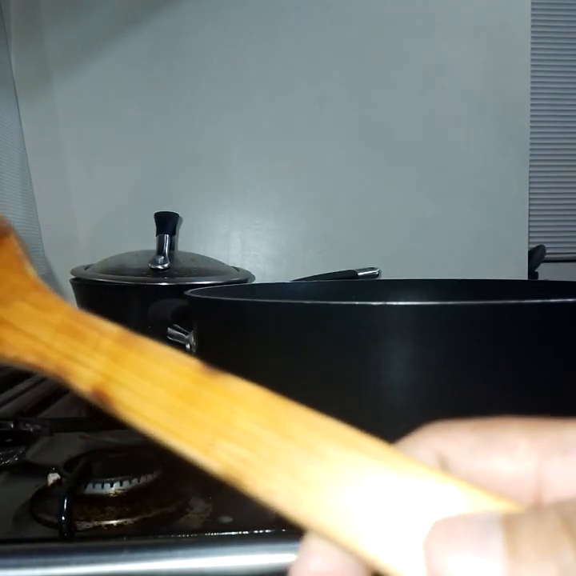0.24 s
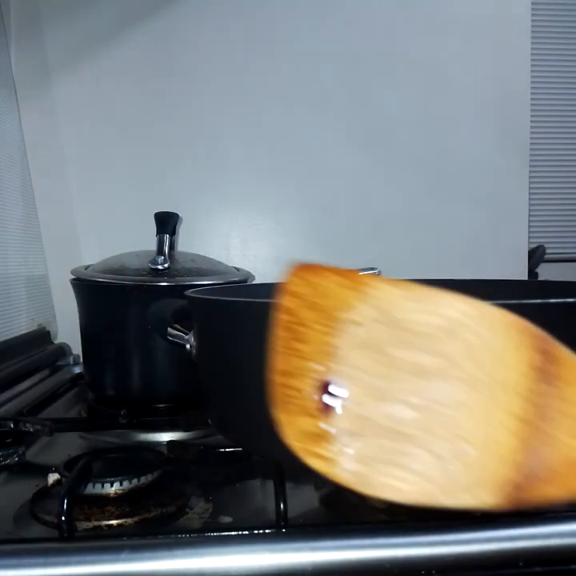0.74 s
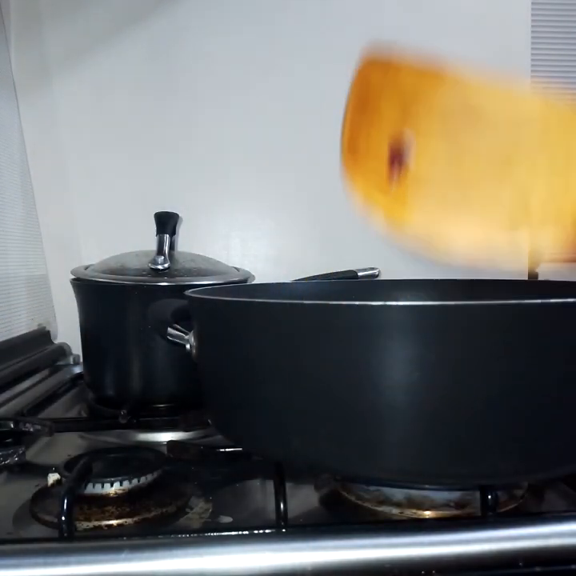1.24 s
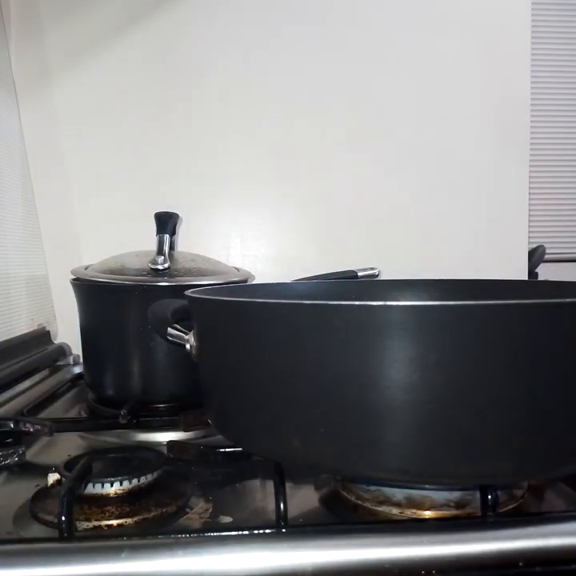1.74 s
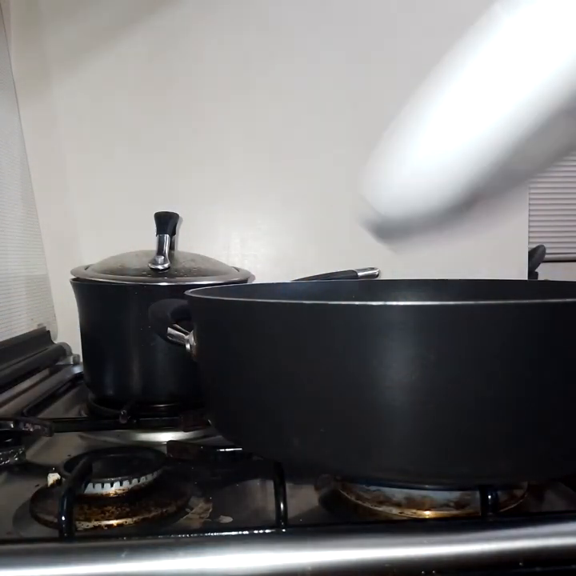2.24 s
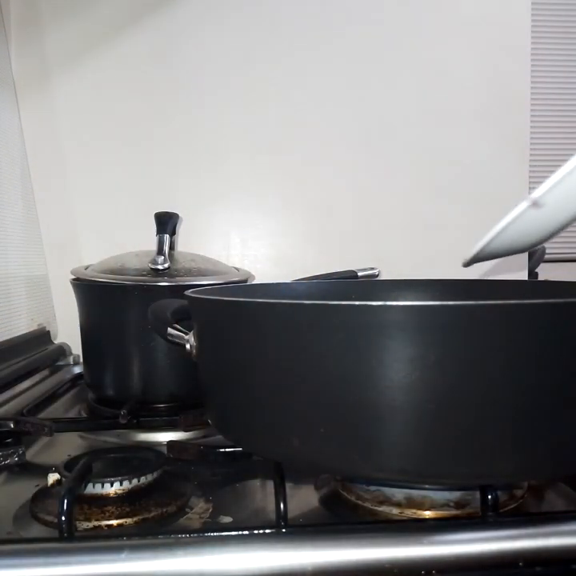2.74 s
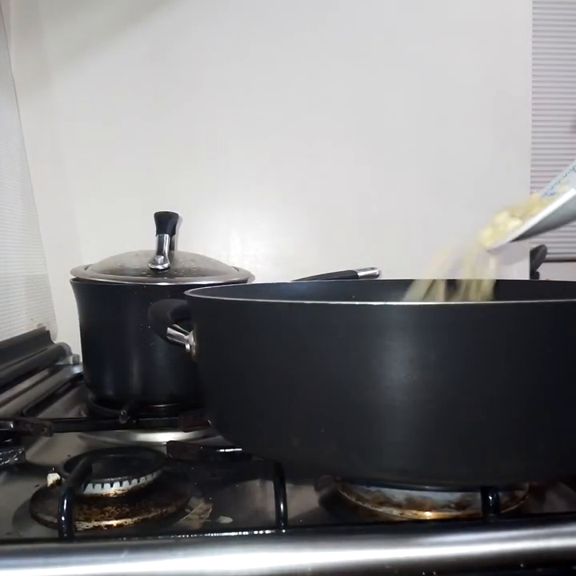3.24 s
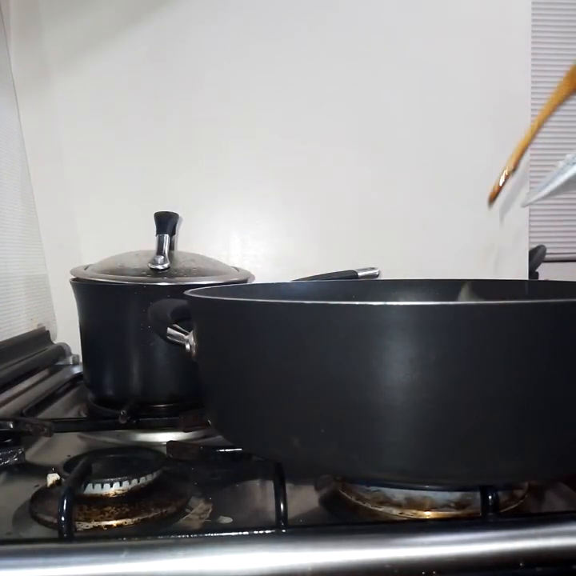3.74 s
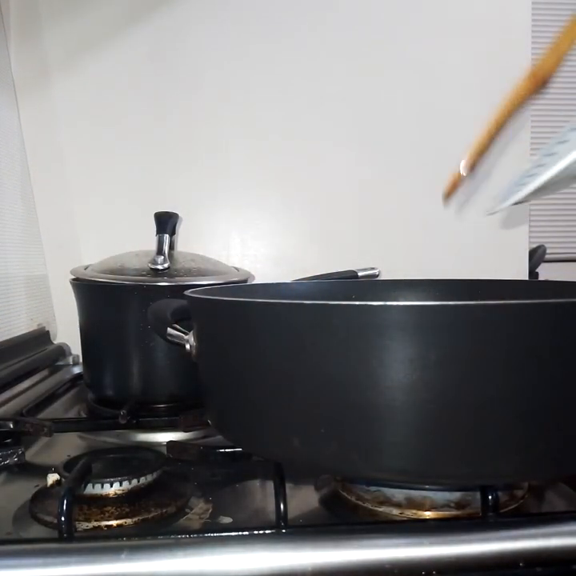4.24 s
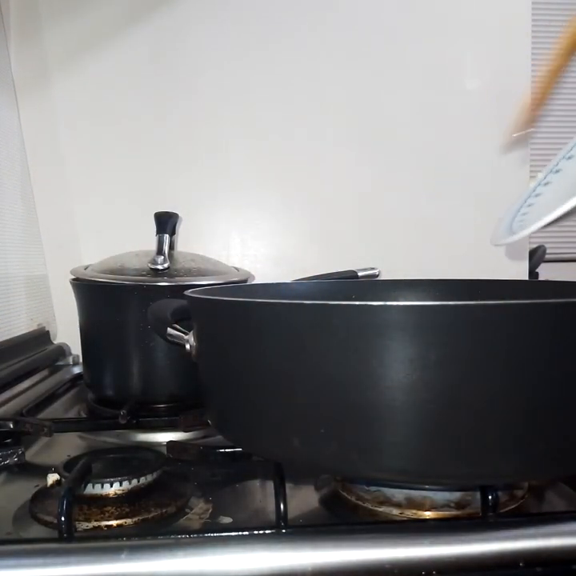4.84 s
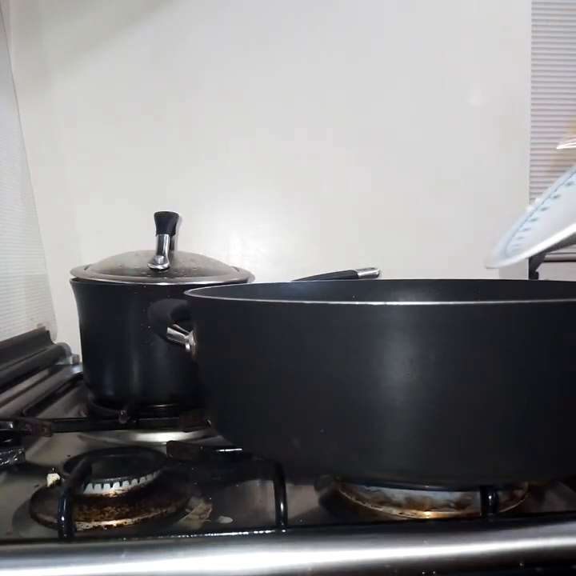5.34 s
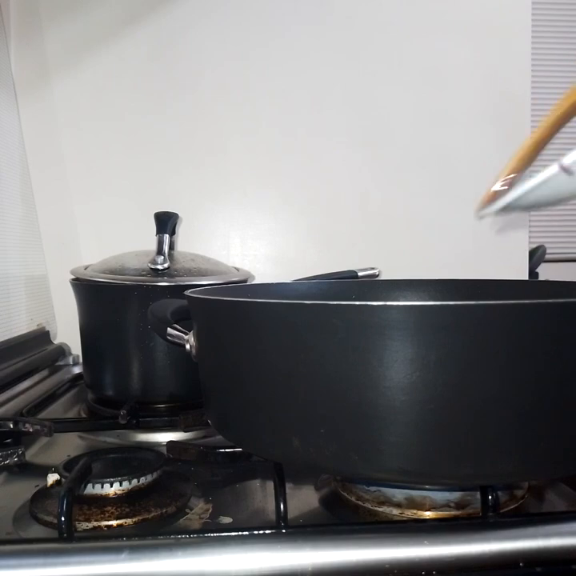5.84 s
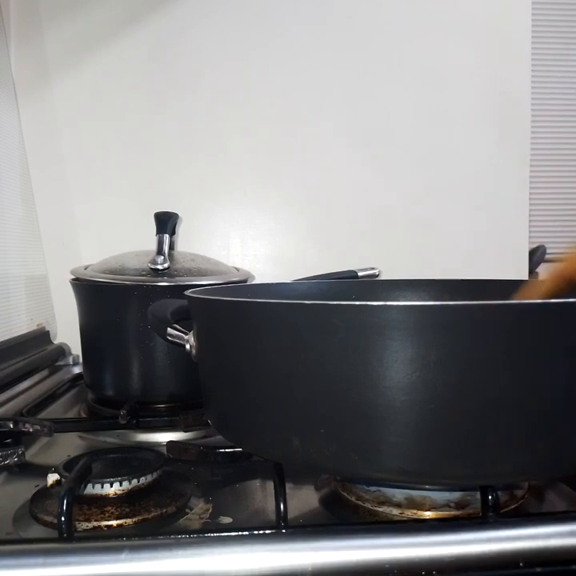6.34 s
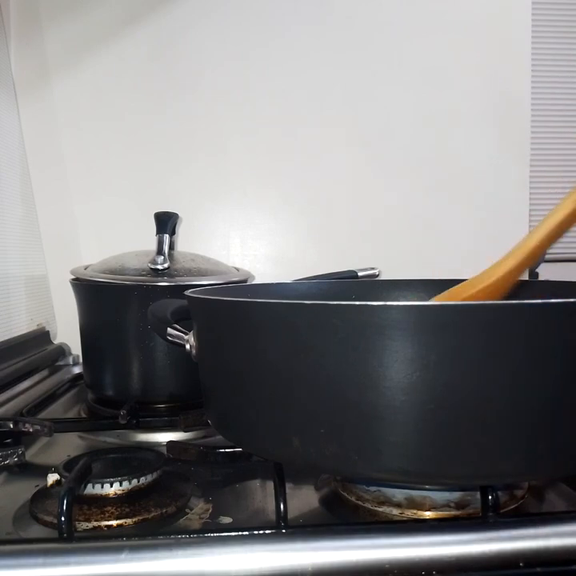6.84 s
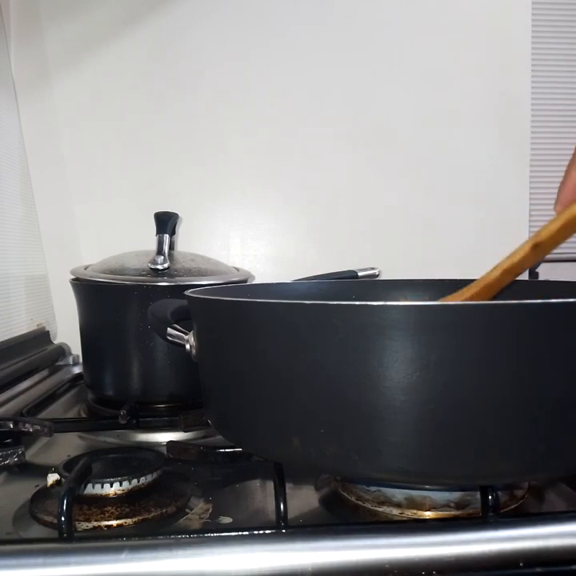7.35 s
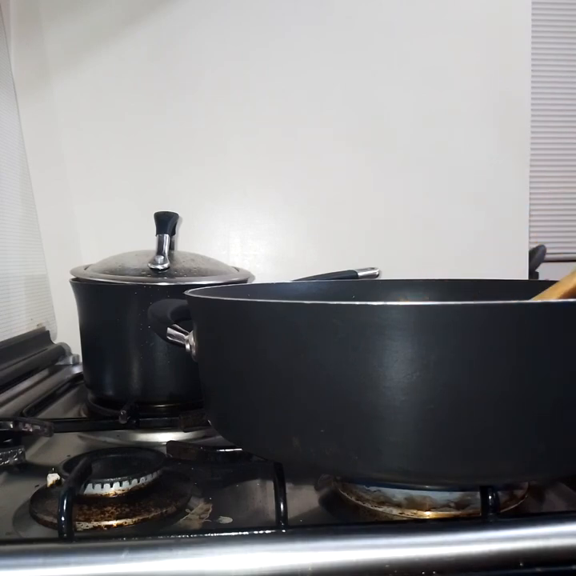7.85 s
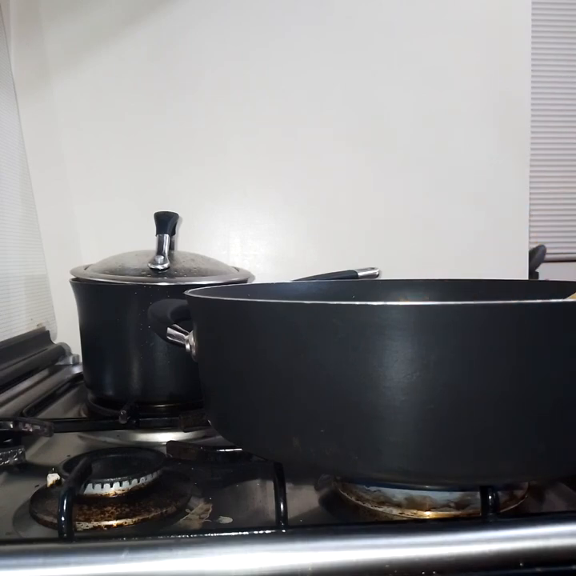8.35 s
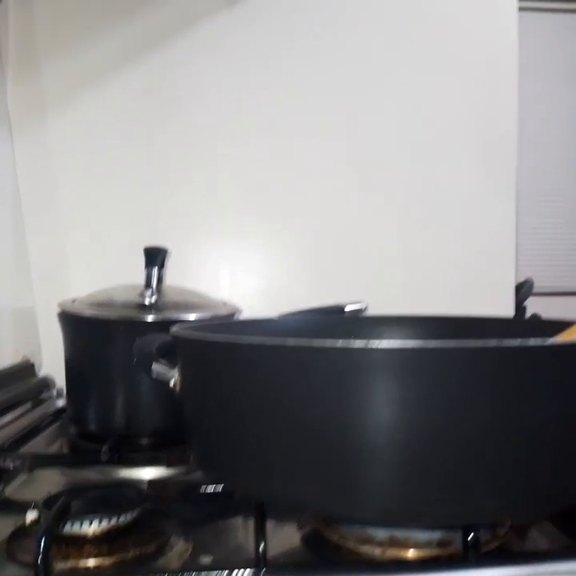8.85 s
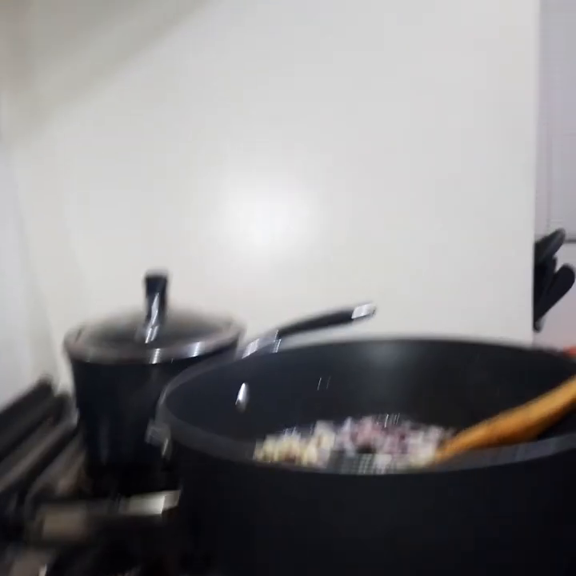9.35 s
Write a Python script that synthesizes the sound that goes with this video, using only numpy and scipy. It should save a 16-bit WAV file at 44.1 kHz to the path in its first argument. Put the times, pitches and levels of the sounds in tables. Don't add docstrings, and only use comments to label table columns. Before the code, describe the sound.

Steady frying fizz with small spits, wood clinking and squeaking on china, a hard dull pan knock, and finally sharp finger clicks very close.

```python
import sys
import numpy as np
from scipy import signal
from scipy.fft import rfft, irfft, next_fast_len
from scipy.io import wavfile
from scipy.ndimage import uniform_filter1d, map_coordinates

SR = 44100
rng = np.random.default_rng(int(sys.argv[2]) if len(sys.argv) > 2 else 0)


def level_to_linear(level):
    exponent = np.asarray(level, float) / 20
    return 10 ** exponent


def materialize(psi):
    bounded = np.clip(np.atleast_2d(psi).T, -1, 1)
    quanta = np.round(bounded * 32767).astype(np.int16)
    wavfile.write(sys.argv[1], SR, quanta)


N = 422919

# (time [s], length [s], rumble [dB], rustle at the left port [dB])
GRIPS = [
    (8.55, 0.14, -67, -71),
    (9.1, 0.1, -54, -53),
]
GRIP_S = 0.05, 0.39
LAG = 22 / SR


def unit(x):
    return x / np.sqrt(np.mean(x ** 2) + 1e-20)


def along(points, hz):
    f, v = np.transpose(points)
    return np.interp(np.log(hz + 1), np.log(f + 1), v)


def curves(rows):
    s, *cols = np.transpose(rows)
    return [np.interp(np.arange(N) / SR, s, c) for c in cols]


def strokes(rows, attack, release, order):
    t = np.arange(0, N, 32) / SR
    db = []
    for row in rows:
        swell = 20 * np.minimum(t - row[0], 0) / attack
        fade = 60 * np.maximum(t - row[0] - row[1], 0) / release
        db.append(row[order] + swell - fade)
    return np.interp(np.arange(N) / SR, t, level_to_linear(np.max(db, axis=0)))


def wobble(rate):
    knots = rng.standard_normal(int(N * rate / SR) + 4)
    return map_coordinates(knots, [np.arange(N) * rate / SR])


def filtered(x, response):
    m = next_fast_len(N + SR // 2)
    return irfft(rfft(x, m) * response(np.fft.rfftfreq(m, 1 / SR)), m)[..., :N]


def resonances(peaks):
    def response(f):
        return sum((-1) ** k * level_to_linear(db) * 1j * f * w / (c * c - f * f + 1j * f * w)
                   for k, (c, w, db) in enumerate(peaks))
    return response


def rush(spectrum, alike, patchy_db, lag=0.):
    z = signal.stft(rng.standard_normal((2, N)), nperseg=512)[2]
    patches = uniform_filter1d(rng.standard_normal(z.shape[1:]), 6, 0)
    patches = uniform_filter1d(patches, 14, 1)
    a, b = signal.istft(z * level_to_linear(patchy_db * unit(patches)), nperseg=512)[1][:, :N]
    alike = np.clip(alike, 0, 1)
    pair = np.array([np.roll(a, round(lag * SR)), alike * a + np.sqrt(1 - alike ** 2) * b])
    return unit(filtered(pair, lambda hz: level_to_linear(along(spectrum, hz))))


def ring(modes, t, scatter_db):
    return sum(level_to_linear(db + scatter_db * rng.normal() - 60 * t / t60) * np.sin(2 * np.pi * hz * t)
               for hz, db, t60 in modes)


def shaken(modes, t, contact, chatter_db):
    force = (level_to_linear(-60 * t / contact) + level_to_linear(chatter_db - 60 * t / 0.58)) * rng.standard_normal(len(t))
    body = signal.fftconvolve(ring(modes, t, scatter_db=3.5), force)[:len(t)]
    return level_to_linear(19.0) * body / np.linalg.norm(body)


def oil():
    # (time [s], level [dB])
    fizz_levels = [(0.0, -57), (1.2, -56.5), (1.42, -57), (1.84, -53), (2.11, -55), (2.32, -56),
                   (3.0, -57.5), (3.12, -55), (3.44, -56), (4.41, -56.5), (4.54, -53.5), (4.78, -56),
                   (5.8, -57.5), (6.01, -55.5), (6.2, -56.5), (8.97, -57), (9.16, -56), (9.59, -55)]
    # (frequency [Hz], level [dB])
    fizz_spectrum = [(2000, -17), (3000, 2), (4000, 1), (6000, 0), (9000, 3.5), (12000, 0), (16000, -3.5)]
    fizz_db, = curves(fizz_levels)
    grains = np.zeros((2, N))
    at = rng.integers(0, N, (2, 9000))
    size = level_to_linear(np.minimum(3.5 * rng.exponential(size=at.shape), 16))
    np.put_along_axis(grains, at, size * rng.choice([-1, 1], at.shape), axis=1)
    crackle = unit(filtered(grains, lambda hz: level_to_linear(along(fizz_spectrum, hz))))
    fizz = rush(fizz_spectrum, alike=0.017, patchy_db=2.0) + level_to_linear(-9.5) * crackle
    sides_db = (0.2 + 0.72 * wobble(4.5)) * np.array([[0.5], [-0.5]])
    level = level_to_linear(fizz_db + sides_db - 4.5 + 0.18 * wobble(4.9) + 0.53 * wobble(30))
    rustle = strokes(GRIPS, *GRIP_S, order=3) * np.array([[1], [0]])
    return np.hypot(level, rustle) * fizz


def spits():
    # (time [s], peak [dB], centre [Hz], left minus right [dB])
    pops = [(0.2887, -40, 6870, -3), (1.3897, -38.5, 7600, 11), (1.4381, -42, 10100, 2),
            (1.487, -42, 6870, 2), (2.1126, -33, 7660, 12), (3.1053, -37, 7220, 3),
            (3.1994, -42, 9730, -1.5), (5.019, -43, 7180, -3), (5.1931, -39, 10400, -3),
            (5.3594, -42, 10500, -4), (6.078, -37, 13000, 0), (6.1764, -47, 10600, 0),
            (7.2095, -40, 9990, -8), (8.6482, -38, 6510, 4), (8.8169, -44, 9840, -4)]
    # (time [s], peak [dB], centre [Hz], left minus right [dB])
    sputters = [(0.203, -36.5, 6880, 9), (0.8894, -43.5, 6700, 6), (1.1563, -42, 9760, -4),
                (1.2845, -42, 9980, -3), (1.5894, -43, 7170, 0.5), (1.749, -35, 9600, -9),
                (1.904, -37.5, 7500, 10.5), (4.0044, -40, 7170, 2.5), (4.36, -43, 7200, -3),
                (4.575, -40, 10300, -5), (6.08, -40, 9790, 3), (7.0194, -43, 7370, -6),
                (9.3995, -41.5, 7150, 1)]
    pop_kind, sputter_kind = (0.015, -4, 0.91), (0.039, -20, 0.59)
    bursts = [(*row, *pop_kind) for row in pops] + [(*row, *sputter_kind) for row in sputters]
    out, t = np.zeros((2, N + SR)), np.arange(SR // 20) / SR
    for s, db, hz, pan_db, t60, spray_db, follow in bursts:
        t60 = np.clip(t60, 0.003, 0.06)
        shape = level_to_linear(-60 * t / t60) * (1 - np.exp(-t / (0.053 * t60)))
        puff, mist = rng.standard_normal((2, 2, len(t))) * shape
        ratio = 1.1 + 0.0028 / t60
        band = [hz / ratio, min(hz * ratio, 20000)]
        pop = signal.lfilter(*signal.butter(2, band, "band", fs=SR), puff)
        spray = signal.lfilter(*signal.butter(2, 11000, "high", fs=SR), mist)
        sides = level_to_linear(np.array([[pan_db], [-pan_db]]) / 2)
        burst = level_to_linear(db - 1.5) * sides * pop + level_to_linear(follow * db + spray_db) * spray
        out[:, round(s * SR):][:, :len(t)] += burst
    return out[:, :N]


def plate():
    # (time [s], ring [dB], spot from well to rim [0-1], flexing [dB], hardness [dB])
    taps = [(1.2851, -52.5, 0.9, 1, -6), (2.2195, -57.5, 0.4, 11, 14), (3.3022, -40, .9, -8, -28),
            (3.335, -63.5, .6, 11, -8), (3.8905, -35, 0.5, -19, -4), (3.922, -47, .8, -25, 0),
            (4.3945, -35, 0.93, -4, -7), (4.929, -46.5, 0.54, 0, -10), (5.3332, -46, 0.5, -6, -21),
            (5.355, -50, 0.84, -16, -23), (5.7225, -42.5, 0.27, -2, -22), (5.805, -46.5, 0.9, 3.5, -5),
            (5.8783, -41.5, 0.98, -4.5, -6.5), (6.8467, -46.5, 0.2, 13.5, -4.5)]
    # (frequency [Hz], level [dB], t60 [s])
    low_families = [
        [(1240, 49, 0.031), (1180, -8, 0.093), (1610, -31, 0.045), (1120, -29, 0.023)],
        [(1989, -10, 0.045), (1910, -16, 0.034), (1895, 11, .04)],
        [(2156, 5, 0.043), (2415, -7, .02), (2530, -8.5, 0.028), (2860, -33, 0.017)],
    ]
    # (frequency [Hz], level [dB], t60 [s])
    upper_modes = [(2885, -3, 0.032), (3680, -5, .01), (4100, -9, .01), (4820, 0.5, 0.027), (5650, 2, .012),
                   (6080, -1, 0.023), (6800, -3, .012), (7100, -8, 0.027), (7500, -11, .015),
                   (8815, -12, .012), (9600, -21, .012)]
    chatter = -12.5, -10.5, -22
    out, t = np.zeros((2, N + SR)), np.arange(SR // 4) / SR
    thin = signal.butter(3, 750, "high", fs=SR)
    for s, db, spot, flex_db, hard_db in taps:
        spot = np.clip(spot, 0, 1)
        gains = level_to_linear(flex_db), np.sqrt(1 - spot), np.sqrt(spot)
        low = sum(level_to_linear(db) * gain * shaken(family, t, contact=0.039, chatter_db=rattle_db)
                  for gain, family, rattle_db in zip(gains, low_families, chatter))
        clatter = (level_to_linear(-60 * t / 0.1) + level_to_linear(-6.5 - 60 * t / 0.13)) * rng.standard_normal(len(t))
        crack = signal.lfilter(*signal.butter(2, [1800, 7500], "band", fs=SR), clatter)
        glaze = shaken(upper_modes, t, contact=0.0087, chatter_db=-27)
        high = level_to_linear(db + hard_db) * (glaze + level_to_linear(-4.5) * crack)
        parts = signal.lfilter(*thin, level_to_linear([[11], [5]]) * [low, high])
        add(out, s, parts, right_db=[-11, -8], wet_db=[[-4.0, -4.0], [-13.5, -7]])
    return out[:, :N]


def scrapes():
    # (time [s], length [s], edge whistle [dB], rim [dB])
    slides = [
        (3.91, .06, -68, -57),
        (4.008, .008, -47, -53),
        (4.395, 0.14, -47, -75),
        (4.55, 0.089, -44.5, -79),
        (4.66, .1, -52, -71),
        (4.78, .3, -58, -75),
        (5.81, 0.022, -56, -55),
        (5.865, 0.031, -66, -49.5),
        (6.078, 0.0097, -53, -57.5),
    ]
    # (frequency [Hz], width [Hz], level [dB])
    edge_modes = [(9730, 60, -9), (9990, 87, -10), (10400, 120, -4), (10900, 70, -9), (13300, 77, -14),
                  (13700, 33, 0), (15400, 240, -10)]
    # (frequency [Hz], width [Hz], level [dB])
    rim_modes = [(7190, 16, 14), (6750, 48, -22), (6870, 110, -1)]
    edge = strokes(slides, attack=0.022, release=0.25, order=2)
    rim = strokes(slides, attack=0.0081, release=0.87, order=3)
    slips = level_to_linear(1.3 * wobble(70)) * rng.standard_normal((2, N))
    whistle = edge * level_to_linear(-13.5) * unit(filtered(slips, resonances(edge_modes)))
    return whistle + rim * level_to_linear([[-7], [-12]]) * unit(filtered(slips, resonances(rim_modes)))


def pan():
    # (time [s], length [s], bottom [dB], wall [dB])
    drags = [
        (3.17, .02, -51.5, -70),
        (3.212, 0.046, -44, -66),
        (3.715, .01, -50.5, -63),
        (6.9, 0.0056, -50, -28),
        (6.905, 0.095, -34, -44.5),
        (7.0, .04, -44, -49),
        (7.06, 0.095, -54.5, -54.5),
    ]
    # (time [s], level [dB])
    bumps = [
        (3.212, -60),
        (6.9, -33),
    ]
    # (frequency [Hz], width [Hz], level [dB])
    bottom_modes = [(528, 22.5, 8.5), (585, 22, 11), (635, 52, 2), (874, 35, -6.5)]
    # (frequency [Hz], width [Hz], level [dB])
    wall_modes = [(1202, 32, 7.5), (1040, 73, 1), (1390, 73, -10), (1600, 82, -6), (1930, 77, -9),
                  (2620, 140, -20)]
    bottom = strokes(drags, attack=0.0095, release=0.16, order=2)
    wall = strokes(drags, attack=0.0055, release=0.068, order=3)
    rub, blows = level_to_linear(2.2 * wobble(60)) * rng.standard_normal(N), np.zeros(N)
    for s, db in bumps:
        blows[round(s * SR):][:18] = level_to_linear(db + 24) * np.hanning(18)
    drive = np.array([rub, blows])
    low_rub, low_blows = filtered(drive, resonances(bottom_modes))
    high_rub, high_blows = filtered(drive, resonances(wall_modes))
    friction = bottom * level_to_linear(-3.5) * unit(low_rub) + wall * level_to_linear(-6.0) * unit(high_rub)
    near = friction + low_blows + high_blows
    direct = np.array([np.roll(near, round(LAG * SR)) * level_to_linear(4.5), near * level_to_linear(-4.0)])
    return direct + level_to_linear([[-4], [-8]]) * kitchen(near[None])[:, :N]


def finger():
    # (time [s], click [dB], pitch [Hz], t60 [s], case [dB])
    snaps = [
        (9.0789, -37, 6470, .006, -50),
        (9.0832, -6, 4930, 0.0027, -28),
        (9.0852, -17, 5170, 0.0066, -41),
        (9.0916, 0, 1970, 0.0025, -14),
        (9.0934, -5.5, 3520, 0.0066, -26),
        (9.0952, -14.5, 4200, 0.0086, -31.5),
    ]
    # (frequency [Hz], level [dB], t60 [s])
    case_modes = [(93, -12, 0.048), (307, 2, 0.045), (357, 6, 0.034), (535, 1.5, 0.013), (813, 3, 0.021),
                  (891, -11, 0.15), (1606, -10, 0.057), (2190, 6, 0.011), (3055, -12, 0.074),
                  (6600, -16.5, 0.043), (11600, -5, .015)]
    out, t = np.zeros((2, N + SR)), np.arange(SR // 6) / SR
    for s, db, hz, t60, case_db in snaps:
        grit = signal.lfilter(*signal.butter(1, [250, 4500], "band", fs=SR), rng.standard_normal(len(t)))
        click = level_to_linear(db - 60 * t / t60) * (1.03 * grit - np.sin(2 * np.pi * hz * t))
        case = level_to_linear(case_db) * ring(case_modes, t, scatter_db=1)
        both = signal.lfilter(*signal.butter(2, 110, "high", fs=SR), click + case)
        add(out, s, both[None], right_db=[-28], wet_db=[[-24], [-33]])
    return out[:, :N]


def stove():
    # (frequency [Hz], level [dB])
    burner_spectrum = [(500, -30.5), (800, -3.5), (1050, 1.5), (1300, -1.5), (1650, 0.5), (1950, 1.5),
                       (2300, -9), (3000, -11.5), (4000, -31), (6000, -15.5)]
    # (frequency [Hz], level [dB])
    burner_far = [(800, -5), (1050, -8), (1650, -8), (1950, -8), (3000, -4)]
    # (frequency [Hz], level [dB])
    rumble_spectrum = [(25, -14.5), (60, -17.5), (120, -14), (160, -30.5), (210, -7.5), (300, 1),
                       (420, -4.5), (520, -2), (700, -4), (1000, -43), (1500, -49)]
    # (frequency [Hz], level [dB])
    rumble_far = [(100, -1.5), (300, -2), (600, -8)]
    flame_db, room_db, hum_db, hum_hz = -56, -63, -84, 120

    def shade(far):
        return lambda hz: level_to_linear([0 * hz, along(far, hz)])

    burner_db, = curves([(9.05, flame_db), (9.3, flame_db - 6)])
    hiss = filtered(rush(burner_spectrum, alike=0.47, patchy_db=1.52, lag=-18 / SR), shade(burner_far))
    rumble = filtered(rush(rumble_spectrum, alike=0.96, patchy_db=0.96), shade(rumble_far))
    rumble_gain = np.hypot(level_to_linear(room_db), strokes(GRIPS, *GRIP_S, order=2))
    hum = level_to_linear(hum_db + 2.3 * wobble(2.38)) * np.sin(2 * np.pi * hum_hz * np.arange(N) / SR)
    return level_to_linear(burner_db) * hiss + rumble_gain * rumble + hum


def kitchen(x):
    # (frequency [Hz], t60 [s])
    room_decay = [(200, 0.43), (1000, 0.44), (3000, 0.67), (8000, 0.46), (15000, 0.99)]
    hz, t, z = signal.stft(rng.standard_normal((2, SR // 3)), SR, nperseg=256)
    fade = level_to_linear(-60 * t / along(room_decay, hz)[:, None])
    tail = signal.istft(z * fade, SR, nperseg=256)[1]
    late = np.pad(x, ((0, 0), (250, 0)))
    return signal.fftconvolve(late, tail / np.linalg.norm(tail[0]), axes=1)


def add(out, s, parts, right_db, wet_db):
    i, n = round(s * SR), parts.shape[1]
    out[0, i:i + n] += parts.sum(axis=0)
    out[1, i - round(LAG * SR):][:n] += level_to_linear(right_db) @ parts
    wet = kitchen(level_to_linear(wet_db) @ parts)
    out[:, i:i + wet.shape[1]] += wet


def scene():
    return oil() + spits() + plate() + scrapes() + pan() + finger() + stove()


def low_pass(x):
    return signal.sosfilt(signal.butter(12, 17030, fs=SR, output="sos"), x)


def record(dry):
    # (frequency [Hz], width [Hz], level [dB])
    cavities = [
        [(7004, 900, 11), (16000, 2400, 5.5)],
        [(10000, 1290, 11)],
    ]
    ceiling, top_hz = 0.8, 15830

    def ports(hz):
        return np.array([1 + sum(resonances([peak])(hz) for peak in peaks) for peaks in cavities])

    x = ceiling * np.tanh(filtered(dry, ports) / ceiling)
    mix = filtered(x, lambda hz: hz < top_hz)
    return low_pass(mix)


dry = scene()
out = record(dry)
materialize(out)
```